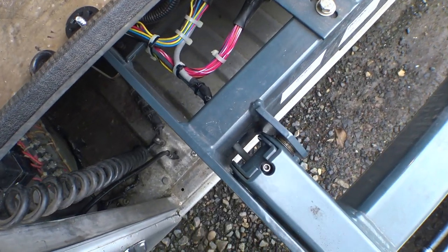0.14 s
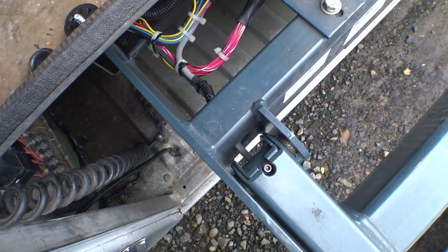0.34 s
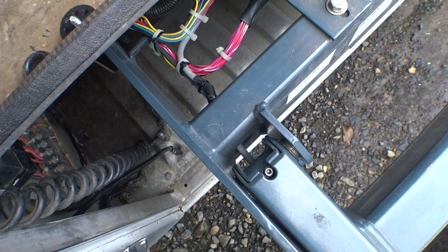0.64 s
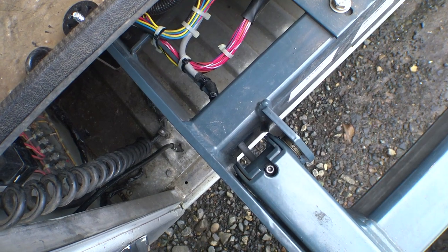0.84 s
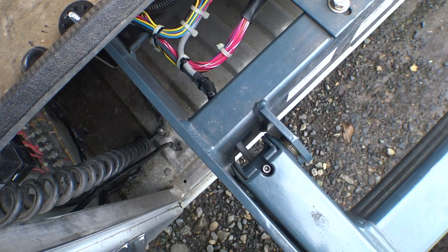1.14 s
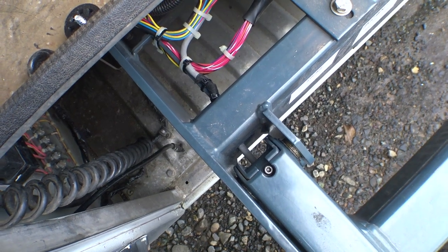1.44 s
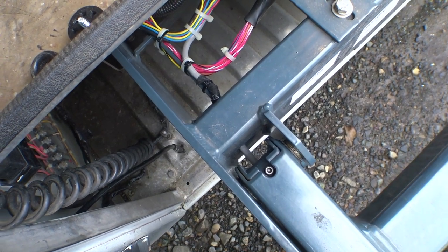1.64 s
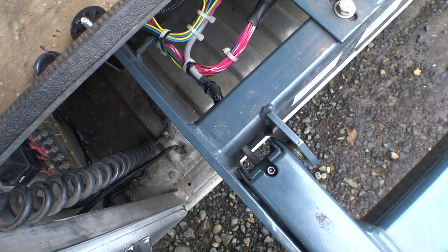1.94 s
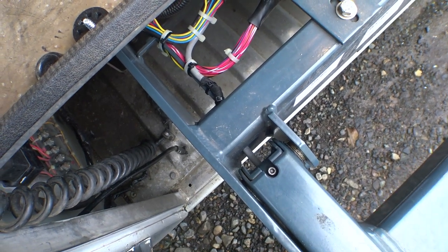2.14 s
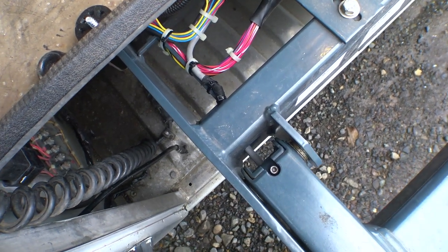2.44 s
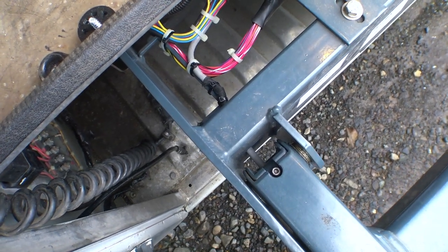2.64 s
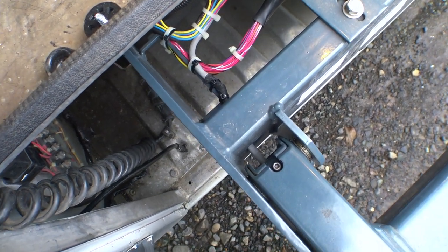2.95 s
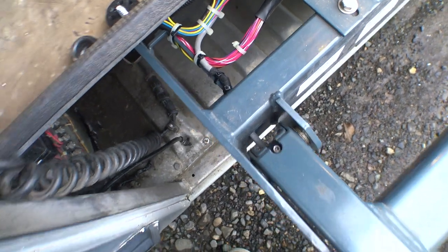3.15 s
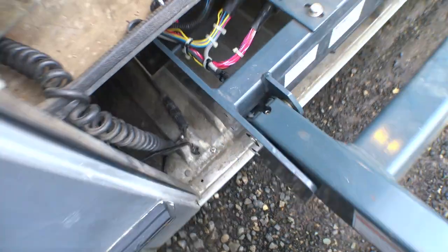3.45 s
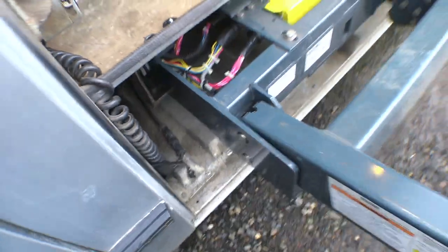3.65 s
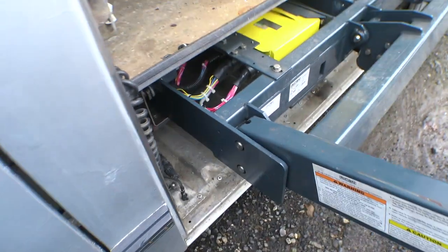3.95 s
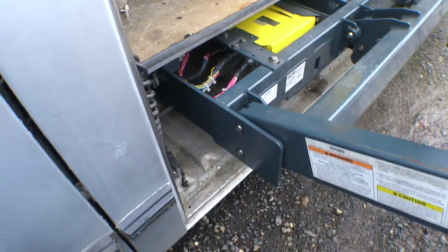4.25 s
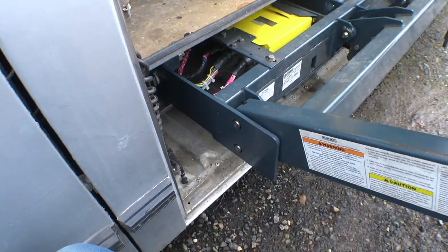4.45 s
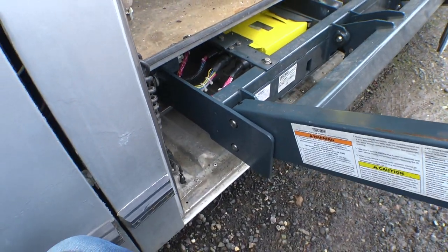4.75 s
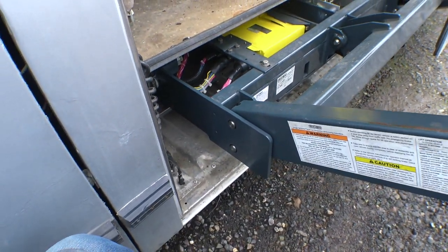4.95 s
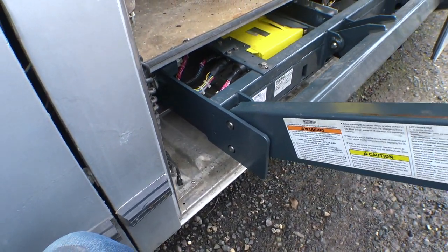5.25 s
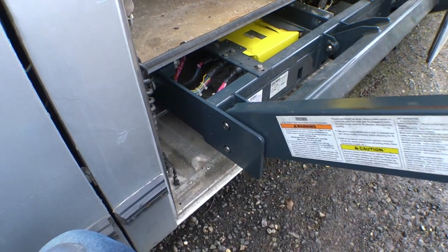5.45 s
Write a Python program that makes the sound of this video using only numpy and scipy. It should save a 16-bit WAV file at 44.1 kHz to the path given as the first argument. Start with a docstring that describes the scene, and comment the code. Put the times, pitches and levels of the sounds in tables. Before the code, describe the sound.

From 0 s a geared electric motor is already running at constant speed, close to the microphone: a wheelchair lift in a van's doorway over gravel. Its buzz repeats about 103 times a second, with a prominent steady note near 930 Hz, a slightly beating tone near 420 Hz, and a thin wavering whine around 7.5 kHz. Rough brush hiss pulses finely with the shaft. Until about 3 s the sound is nearly unchanged, with very faint air movement. Between 3.1 and 4.2 s the camera swings aside: the main note drops markedly, the whine flickers, and short metallic door reflections ripple the treble. A small gust comes at 3.5 s, then a heavy, low wind thump around 4.0-4.1 s. Afterwards the motor continues, less note-led and hummier, over soft low rumble with gusts near 4.4, 4.75 and 5.0 s and another low push at 5.3 s. It never stops before the cut at 5.6 s.

```python
"""A geared hum with a buzzing whine and brush hiss: a wheelchair lift's motor under load in a van's door well.
The shaft turns a little over 103 times a second; its harmonics, gear tones and pulsing noise all follow it.
A hand-held camera looks down at it, then swings aside: the balance shifts and short door echoes ripple the treble.
Air adds a rumble of filtered noise that grows with the swing, with gusts and short low pushes on the microphone,
three of them overlapping in one heavy thump near 4 s."""
import sys
import numpy as np
from scipy import signal
from scipy.fft import rfft, irfft
from scipy.io import wavfile
from scipy.ndimage import uniform_filter1d, map_coordinates

SR = 44100
rng = np.random.default_rng(int(sys.argv[2]) if len(sys.argv) > 2 else 0)


def transcribe(u):
    """Save the signal u as a 16-bit wav file named by the first command-line argument.

    u: samples, shape (n,) or (channels, n), limited to [-1, 1]; the rate is SR.
    q: integer samples, one column per channel.
    """
    v = np.clip(np.atleast_2d(u).T, -1, 1)
    q = np.round(v * 32767).astype(np.int16)
    wavfile.write(sys.argv[1], SR, q)


N = 246519
TIME = np.arange(N) / SR
FRAME_RATE = 100  # control frames per second
CYCLE = 3  # turns in one pattern of the motor
EDGE_HZ = 15750  # upper band limit

# Shaft speed before its small jitter, sagging under load: time_s [s], speed [turns/s]
SHAFT_SPEED = [(0.0, 103.5), (.75, 103.46), (1.85, 103.3), (3.1, 103.46), (3.5, 103.3), (4.3, 103.64),
               (5.59, 103.61)]
# Microphone place: time_s [s], swing [0 above the motor to 1 aside]
MIC_SWING = [(0, 0.14), (1.5, 0.12), (2.9, 0.097), (3.3, 0.15), (3.55, 0.44), (3.9, 0.724), (4.2, 0.93),
             (5.59, 1)]
# Slow swell of hiss and tones, except note, ring and whine: time_s [s], level_db [dB]
LOAD_SWELL = [(0, -0.5), (.6, -0.24), (1.5, -0.07), (2.6, 0), (3.3, -0.2), (3.85, 0.7), (4.3, -0.4),
              (5, -1), (5.59, -0.4)]

# Tone levels below are starting points for the trims, fades and throb in the functions.
# Strong drive tones: order [cycles/turn], above_db [dB above the motor], aside_db [dB aside]
DRIVE_TONES = [(1, -53, -62), (3, -47.8, -40), (4, -45.5, -47.5), (5, -41, -41), (6, -44, -46),
               (7, -39, -45), (8, -52, -54), (10, -56, -52), (11, -51, -58), (12, -49, -52), (13, -48, -60),
               (14, -63, -51), (15, -60, -64), (17, -61, -62), (19, -56, -54), (20, -51, -58),
               (21, -53, -53), (23, -57, -55), (26, -60, -72), (32, -59, -59), (33, -60, -56),
               (36, -44.5, -55), (37, -56, -54), (38, -53, -57), (47, -51, -68), (48, -67, -56),
               (63, -55, -60), (66, -55, -52), (69, -44, -47.5), (70, -50, -53), (71, -53, -50),
               (74, -56, -62), (75, -53, -57), (81, -57, -58), (82, -49, -60), (86, -54, -56),
               (87, -53, -65), (98, -54, -66), (105, -55, -65), (108, -60, -56), (144, -69, -63)]
# Envelope of the other shaft harmonics: pitch_hz [Hz], above_db [dB], aside_db [dB]
BUZZ_ENVELOPE = [(210.0, -49.5, -51.5), (1860.0, -69, -82), (2300, -74, -65), (2880, -64.5, -71),
                 (4080, -55.5, -60), (4660, -68.5, -56), (5900, -56, -78.5), (7030.0, -67, -62),
                 (8480.0, -72, -61.5), (9500, -52.5, -64), (11000, -69, -62), (11200, -58, -62),
                 (13000, -92, -78), (15100.0, -71, -70)]
# Main note: time_s [s], level_db [dB]
MAIN_NOTE = [(0.1, -34), (0.2, -33), (3.39, -34.5), (3.66, -40), (5.18, -44), (5.5, -45.5)]
NOTE_ORDER = 9  # cycles per turn
# Ringing tone in the treble: time_s [s], level_db [dB]
TREBLE_RING = [(0.05, -48), (0.68, -51), (3.07, -47), (3.45, -54), (3.54, -44), (3.62, -56), (4.41, -62),
               (5.55, -52)]
RING_ORDER = 46  # cycles per turn
# Joint level of the high whine's two harmonics: time_s [s], level_db [dB]
HIGH_WHINE = [(0.05, -43), (0.14, -53), (0.34, -39.5), (1.69, -34.5), (3.08, -43), (3.17, -36.5),
              (3.34, -40.5), (3.37, -38), (3.56, -45), (3.59, -38.5), (3.82, -35.5), (4.02, -49),
              (4.19, -41), (4.35, -49), (5.55, -41.5)]
# The whine's neighbouring harmonics: lower, upper [cycles/turn]
WHINE_PAIR = (72, 73)
UPPER_SHARE_ABOVE, UPPER_SHARE_ASIDE = 0.86, 0.22  # upper harmonic's part of the whine's power, 0-1

# Gear tones out of step with the shaft: order [cycles/turn], above_db [dB], aside_db [dB]
GEAR_TONES = [(1.745, -54.5, -57), (2.6, -63, -67), (4.087, -46, -48.5), (6.667, -64, -58),
              (13.333, -61, -68), (15.333, -66, -58), (20.087, -57, -63), (33.667, -55, -62),
              (37.333, -60, -57), (40.667, -66, -58), (52.333, -68, -56)]
# Relative colour of brush and bearing hiss: pitch_hz [Hz], above_db [dB per Hz], aside_db [dB per Hz]
HISS_COLOUR = [(40, -23, -7), (132, 5, 11), (240, 10, 11.5), (477, 19, 15.5), (870, 15, 12), (1450, 6.5, 6),
               (1790, 7.5, 5), (2150, 14, 12), (2430, 2.5, 0.5), (3110, 2.5, 4.5), (3480, 14, 5.5),
               (5530, 8, 8), (7870, 13.5, 11), (7940, 7.5, 4.5), (8900, 10.5, 8.5), (12350, -1.5, -7.5),
               (15500, -8.5, -8)]
HISS_DB = -36.5  # overall rms level
# Strength of the door's reflections beside the microphone: time_s [s], gain [ratio]
DOOR_REFLECTION = [(2.9, 0.051), (3.15, 0.11), (3.4, 0.41), (3.75, 0.33), (3.95, 0.014), (4.2, 0)]

# Relative colour of the air's rumble: pitch_hz [Hz], level_db [dB per Hz]
RUMBLE_COLOUR = [(10, -31), (30, -4), (55, 5), (85, 4), (170, -5.5), (260, -15.5), (500, -36), (2000, -82)]
# Air level: sheltered above the motor, stronger aside, always a little lumpy
AIR_ABOVE_DB, AIR_ASIDE_DB, LUMPS_DB, LUMP_S = -63.5, -45.5, 1.5, 0.09
# Gusts, alike on both sides of their peak: peak_s [s], level_db [dB], half_s [half length, s]
AIR_GUSTS = [(0.297, -54, 0.1), (1.92, -55, .05), (2.46, -49, 0.055), (2.97, -55, .04), (3.544, -47, 0.055),
             (4.045, -32, .07), (4.42, -41, 0.057), (4.75, -39.5, 0.098), (5.007, -40.5, 0.11),
             (5.413, -42, .05)]
# Short low pushes, three overlapping in one heavy thump near 4 s: peak_s [s], peak_db [dB], pitch_hz [Hz]
AIR_BUFFETS = [(2.43, -42, 42), (4.002, -26, 56), (4.026, -24, 60), (4.067, -21, 91.5), (5.037, -35, 70),
               (5.318, -27.5, 75)]


def amp(db):
    """Decibels to gain."""
    return 10 ** (np.asarray(db) / 20)


def curve(rows, t, axis=1):
    """One column of a table, joined by straight lines in time."""
    rows = np.asarray(rows, float)
    return np.interp(t, rows[:, 0], rows[:, axis])


def spectrum(rows, hz, axis=1):
    """One column of a table, joined by straight lines over log frequency."""
    rows = np.asarray(rows, float)
    return np.interp(np.log(hz + 1), np.log(rows[:, 0]), rows[:, axis])


def bin_hz(size):
    """Frequencies of the bins of a real transform."""
    return np.fft.rfftfreq(size, 1 / SR)


def unit(x):
    """Scales to rms 1."""
    return x / np.sqrt(np.mean(abs(x) ** 2) + 1e-20)


def complex_noise(shape):
    """Gaussian noise with independent real and imaginary parts."""
    return rng.standard_normal(shape) + 1j * rng.standard_normal(shape)


def drift(shape, span):
    """Complex noise that changes smoothly over span steps of the first axis."""
    keep = np.exp(-(np.fft.fftfreq(shape[0]) * span * np.pi) ** 2)
    smoothed = np.fft.fft(complex_noise(shape), axis=0) * keep[:, None]
    return unit(np.fft.ifft(smoothed, axis=0))


def mic_swing(t):
    """Microphone place, from 0 above the motor to 1 aside."""
    return np.clip(curve(MIC_SWING, t), 0, 1)


def heard_db(above_db, aside_db, t):
    """Levels (times x parts) as the microphone swings from above the motor to its side."""
    swing = mic_swing(t)[:, None]
    return (1 - swing) * above_db + swing * aside_db + curve(LOAD_SWELL, t)[:, None]


def motor(turns, fading=0.57, whine_fading=0.2, fading_hz=4970.0, flutter=0.26, flutter_span=4.4,
          throb=0.15, throb_hz=930, dispersion=8.2, jumble_hz=1140.0):
    """Shaft harmonics in a three-turn pattern, throbbing with a slow gear."""
    size, top_order, slow_gear = 8192, 153, 0.087  # samples per pattern, cycles/turn, cycles/turn
    t = np.arange(int(TIME[-1] * FRAME_RATE) + 2) / FRAME_RATE
    line = np.arange(top_order * CYCLE)
    order = line / CYCLE
    hz = order * np.mean(curve(SHAFT_SPEED, t))
    level_db = line_levels(hz, t)

    # short waves fade in and out as the hand moves among the reflections, fastest during the swing
    path = np.rint((t + 2 * mic_swing(t)) * FRAME_RATE).astype(int)
    steadier = np.isin(order, (NOTE_ORDER, RING_ORDER, *WHINE_PAIR))
    depth = np.where(steadier, whine_fading, fading) * np.minimum(hz / fading_hz, 1)
    wandering = drift((2 * len(t), len(line)), 84)[path]
    fade = (1 + depth * wandering) / np.sqrt(1 + depth ** 2)

    # uneven brush contact roughens the high harmonics; flutter is the depth at 10 kHz
    rough = flutter * hz / 10000 * drift(level_db.shape, flutter_span)

    # the slow gear puts a side tone just above each line
    jumble, lag = rng.random((2, len(line)))
    gear_cycles = slow_gear * np.interp(t, TIME, turns)[:, None] + lag
    side = throb * np.minimum(hz / throb_hz, 1) * np.exp(2j * np.pi * gear_cycles)

    # bending waves in the frame bring the highs first, and reflections jumble the treble
    start_cycles = jumble * np.minimum(hz / jumble_hz, 1) ** 2 - dispersion * np.sqrt(order)
    lines = amp(level_db) * fade * (1 + rough + side) * np.exp(2j * np.pi * start_cycles)
    lines = lines * (line >= CYCLE)  # nothing below one cycle a turn

    # one waveform a frame, read round by the shaft angle
    shapes = irfft(lines, size, axis=1) * size / np.sqrt(2)
    shaft_angle = turns / CYCLE % 1 * size
    return map_coordinates(shapes, [TIME * FRAME_RATE, shaft_angle], order=1, mode="grid-wrap")


def line_levels(hz, t, tone_db=0.28, buzz_db=-3.0, scatter_db=4.0,
                third_db=-7.0, third_fade_hz=8900.0, third_low_hz=700.0):
    """Levels (times x lines) of the motor's buzz, strong tones, main note, ring and whine."""
    # weak lines between the harmonics: three turns in a row are not quite alike
    bass_cut_db = 20 * np.log10(np.maximum(third_low_hz / (hz + 1), 1) ** 2)
    weak_db = third_db - 10 * hz / third_fade_hz - bass_cut_db
    between_db = np.where(np.arange(len(hz)) % CYCLE, weak_db, 0)

    buzz = [spectrum(BUZZ_ENVELOPE, hz, axis=1), spectrum(BUZZ_ENVELOPE, hz, axis=2)]
    place_db = np.array(buzz) + buzz_db + between_db
    place_db -= 20 * np.log10(np.maximum(450 / (hz + 1), 1))  # the small housing radiates little bass
    place_db += scatter_db * np.clip(rng.standard_normal(place_db.shape), -2, 1)
    for order, above_db, aside_db in DRIVE_TONES:
        place_db[:, order * CYCLE] = above_db + tone_db, aside_db + tone_db

    level_db = heard_db(*place_db, t)
    level_db[:, NOTE_ORDER * CYCLE] = curve(MAIN_NOTE, t)
    level_db[:, RING_ORDER * CYCLE] = curve(TREBLE_RING, t)

    # the whine leans to its lower harmonic as the camera swings
    swing = mic_swing(t)
    upper = np.clip((1 - swing) * UPPER_SHARE_ABOVE + swing * UPPER_SHARE_ASIDE, 0, 1)
    for order, share in zip(WHINE_PAIR, (1 - upper, upper)):
        level_db[:, order * CYCLE] = curve(HIGH_WHINE, t) + 10 * np.log10(share + 1e-9)
    return level_db


def gears(turns, waver=0.31, waver_hz=1500.0):
    """Gear tones; the strongest beats with the fourth harmonic nine times a second."""
    orders, above_db, aside_db = np.transpose(GEAR_TONES)
    t = np.arange(0, TIME[-1], 1 / FRAME_RATE)
    hz = orders * np.mean(curve(SHAFT_SPEED, t))
    depth = waver * np.minimum(hz / waver_hz, 1)  # low tones are the steadiest
    gains = amp(heard_db(above_db, aside_db, t)) * (1 + depth * drift((len(t), len(orders)), 11))
    out = np.zeros(N)
    for order, gain in zip(orders, gains.T):
        rotation = np.exp(2j * np.pi * (order * turns + rng.random()))
        out += (np.interp(TIME, t, gain) * rotation).real
    return np.sqrt(2) * out


def brushes(turns, ripple_db=3.5, ripple_span=1.42, ripple_hz=2020.0, patch_db=1.5,
            pulsing=0.11, contact_pulsing=0.1):
    """Rubbing noise, coloured by random narrow ripples and pulsing with the shaft."""
    size, hop, contacts = 2048, 512, 4  # samples, samples, contact pulses per turn
    hz, t = bin_hz(size), np.arange(N // hop + 5) * hop / SR

    # random narrow ripples colour the hiss, shallower in the bass, different at each microphone place
    ripple_depth_db = ripple_db * np.minimum(0.5 + hz / ripple_hz / 2, 1)
    ripple = ripple_depth_db * unit(drift((len(hz), 2), ripple_span).real).T
    above_db = spectrum(HISS_COLOUR, hz, axis=1) + ripple[0]
    aside_db = spectrum(HISS_COLOUR, hz, axis=2) + ripple[1]
    level_db = heard_db(above_db, aside_db, t)

    # broad patches of the hiss flicker
    patches = uniform_filter1d(drift(level_db.shape, 1.4).real, size=24, axis=1)
    level_db += patch_db * unit(patches)

    bins = amp(level_db) * complex_noise(level_db.shape)
    noise = signal.istft(bins.T, nperseg=size, noverlap=size - hop)[1][:N]
    shaft_pulse = pulsing * np.cos(2 * np.pi * turns)
    contact_pulse = contact_pulsing * np.cos(2 * np.pi * contacts * turns)
    return amp(HISS_DB) * unit(noise * (1 + shaft_pulse + contact_pulse))


def door(x, lowest_hz=3200.0, first_ms=0.397, spread_ms=3.0, travel_ms=0.96, count=6):
    """A few short echoes, whose paths change with the swing, ripple through the treble."""
    high_pass = signal.butter(2, lowest_hz, "highpass", fs=SR, output="sos")
    treble = signal.sosfilt(high_pass, x)
    moved_ms = travel_ms * mic_swing(TIME)
    echoes = np.zeros(N)
    for distance, heading in rng.random((count, 2)):
        # travel_ms keeps the delay positive when a path shortens
        delay_ms = first_ms + travel_ms + spread_ms * distance + moved_ms * np.cos(np.pi * heading)
        echoes += map_coordinates(treble, [(TIME - delay_ms / 1000) * SR], order=2)
    return x + curve(DOOR_REFLECTION, TIME) * echoes / np.sqrt(count)


def air(buffet_cycles=0.38):
    """Low rumble of moving air that grows with the swing, with gusts and short low pushes."""
    coloured = rfft(rng.standard_normal(N)) * amp(spectrum(RUMBLE_COLOUR, bin_hz(N)))
    rumble = unit(irfft(coloured, N))
    t = np.arange(0, TIME[-1], 1 / FRAME_RATE)
    swing = mic_swing(t)
    lumps = unit(drift((len(t), 1), LUMP_S * FRAME_RATE).real)[:, 0]
    level_db = (1 - swing) * AIR_ABOVE_DB + swing * AIR_ASIDE_DB + LUMPS_DB * lumps
    power = amp(level_db) ** 2
    for peak_s, gust_db, half_s in AIR_GUSTS:
        gust = amp(gust_db) * np.exp(-((t - peak_s) / half_s) ** 2)
        power += gust ** 2
    out = rumble * np.interp(TIME, t, np.sqrt(power))

    # each push is a short wave whose main peak points down
    for peak_s, peak_db, pitch_hz in AIR_BUFFETS:
        cycles = (TIME - peak_s) * pitch_hz
        out -= amp(peak_db) * np.cos(2 * np.pi * cycles) * np.exp(-(cycles / buffet_cycles) ** 2)
    return out


def shaft(speed_jitter=0.000301):
    """Turns made so far: the shaft speed, a little unsteady, summed over time."""
    t = np.arange(0, TIME[-1], 1 / FRAME_RATE)
    unsteady = np.interp(TIME, t, unit(drift((len(t), 1), 7.22).real)[:, 0])
    return np.cumsum(curve(SHAFT_SPEED, TIME) * (1 + speed_jitter * unsteady)) / SR


def scene():
    """One shaft drives every sound of the lift; the door reflects them and air is added."""
    turns = shaft()
    lift = motor(turns) + gears(turns) + brushes(turns)
    return (door(lift) + air())[None]


def record(dry):
    """The camera's band limit: a steep linear-phase low-pass."""
    low_pass = signal.firwin(801, EDGE_HZ, window=("kaiser", 9), fs=SR)
    return signal.oaconvolve(dry, low_pass[None], "same")


dry = scene()
out = record(dry)
transcribe(out)
```